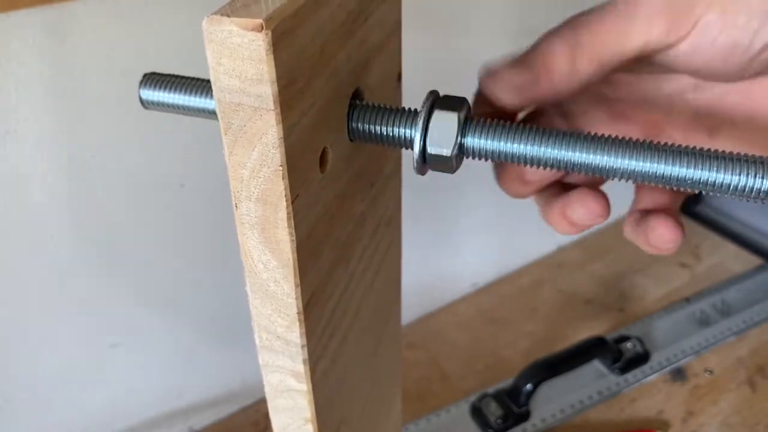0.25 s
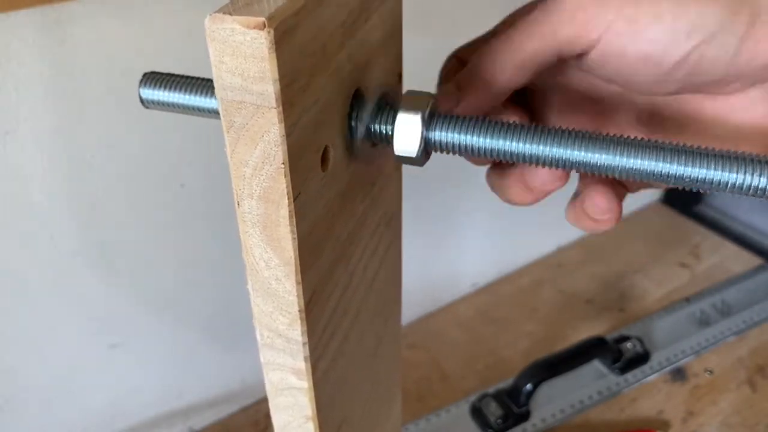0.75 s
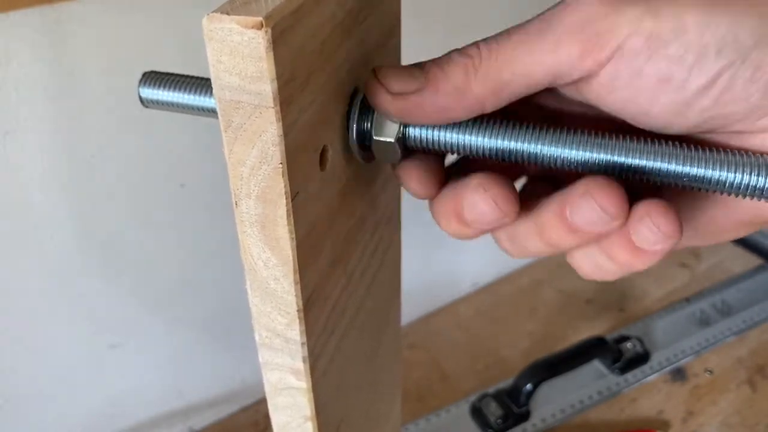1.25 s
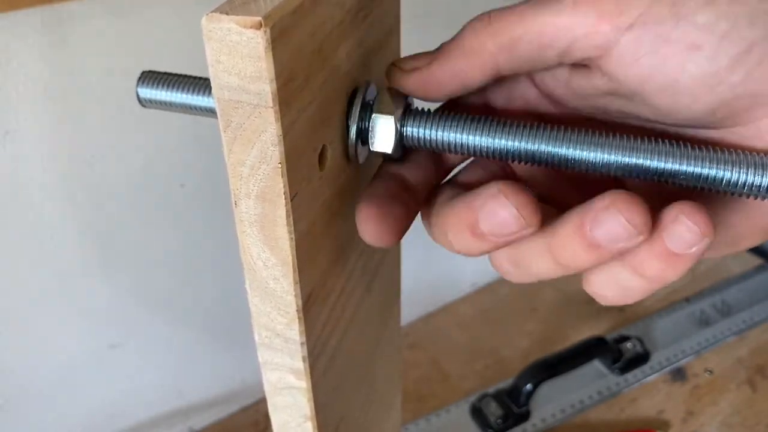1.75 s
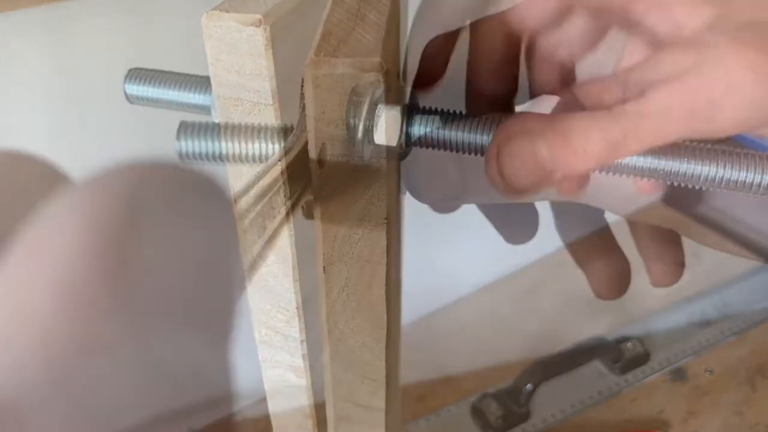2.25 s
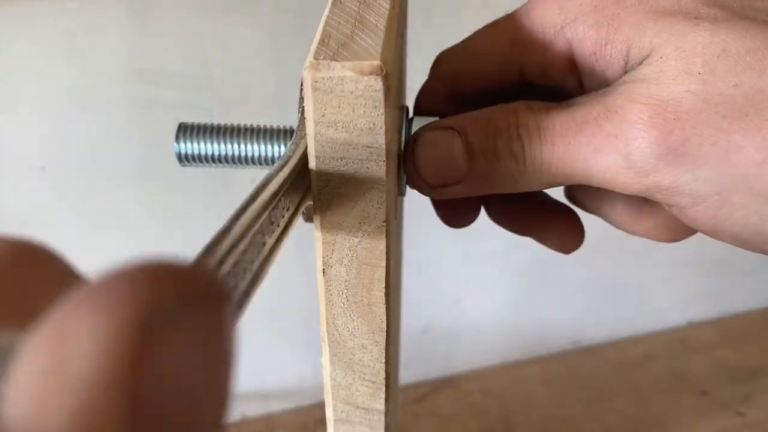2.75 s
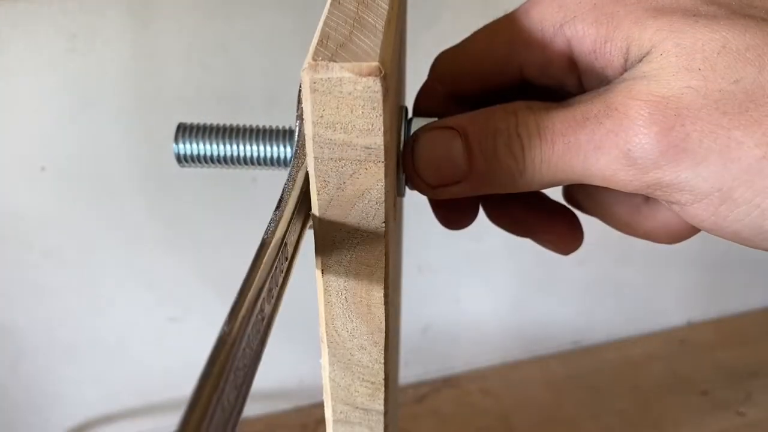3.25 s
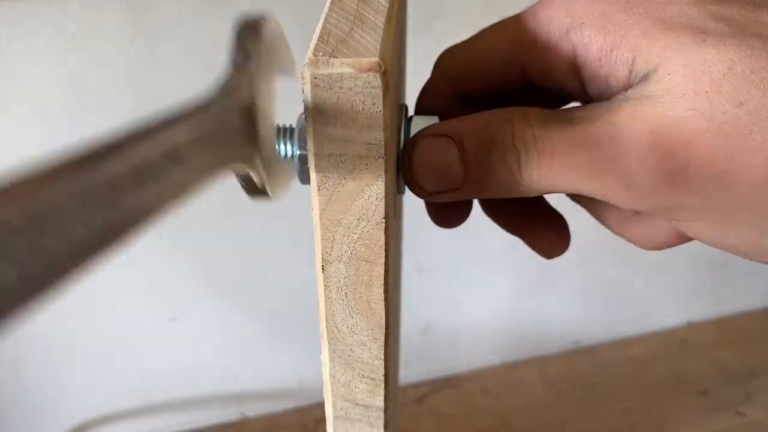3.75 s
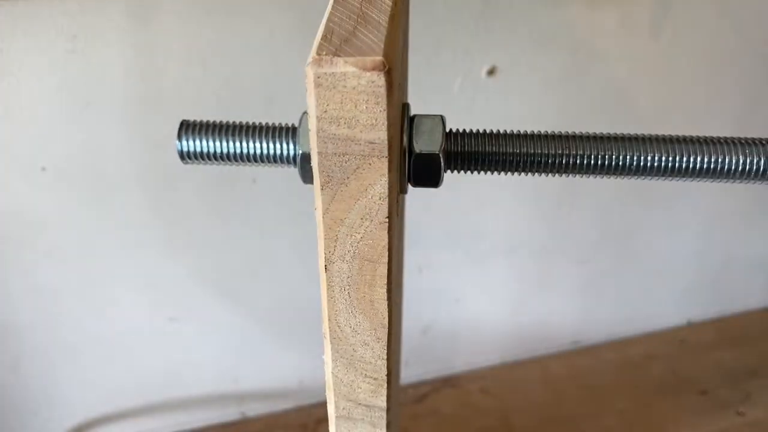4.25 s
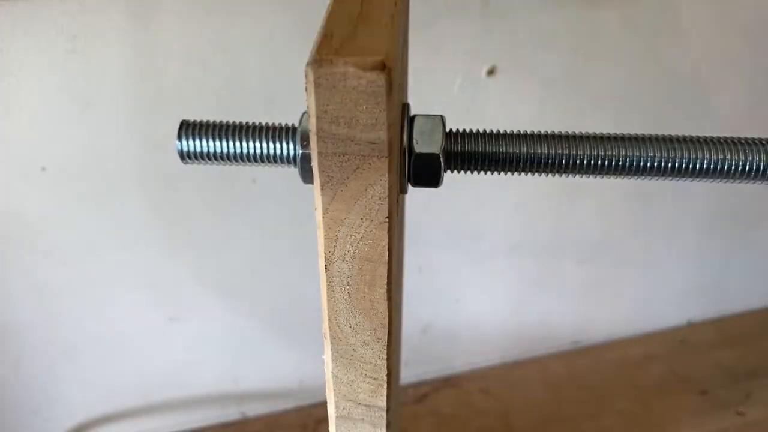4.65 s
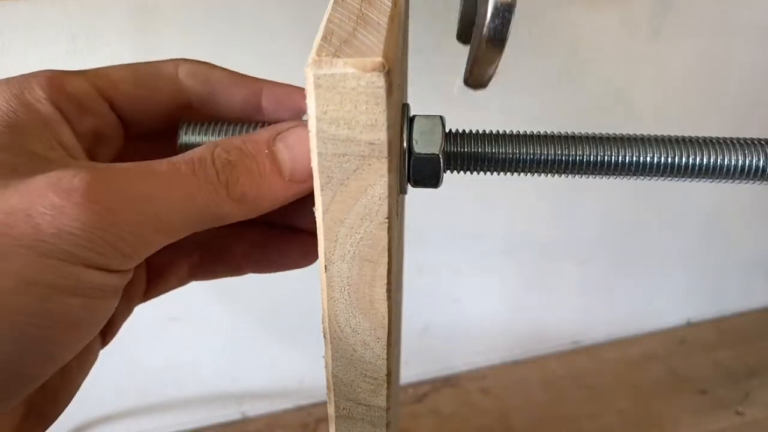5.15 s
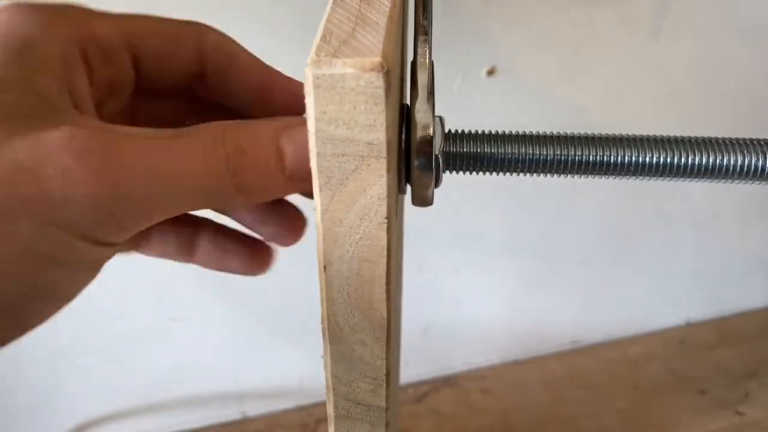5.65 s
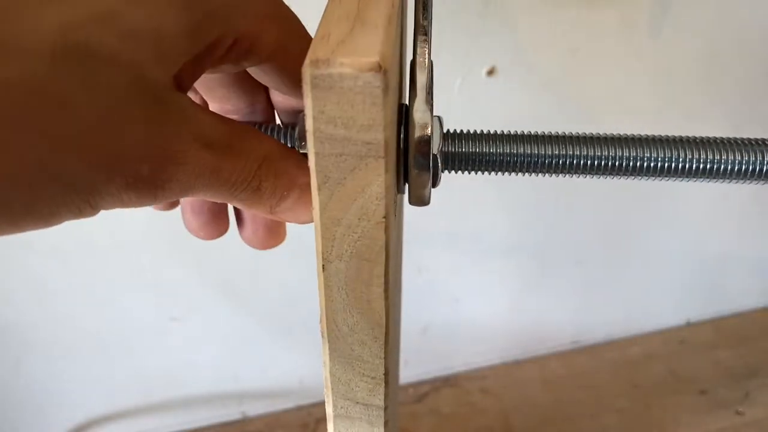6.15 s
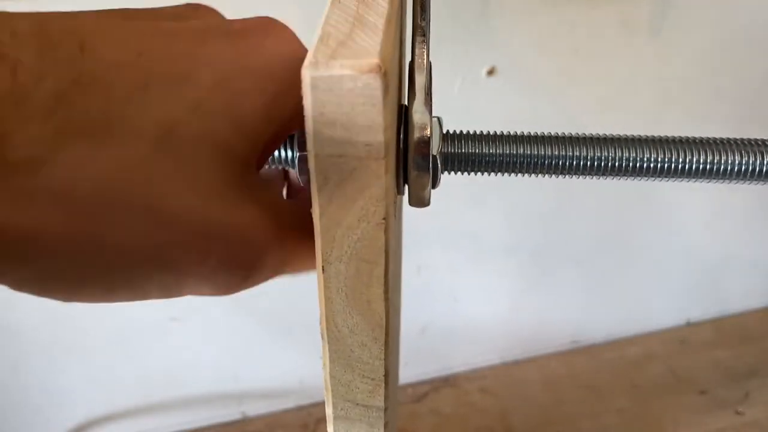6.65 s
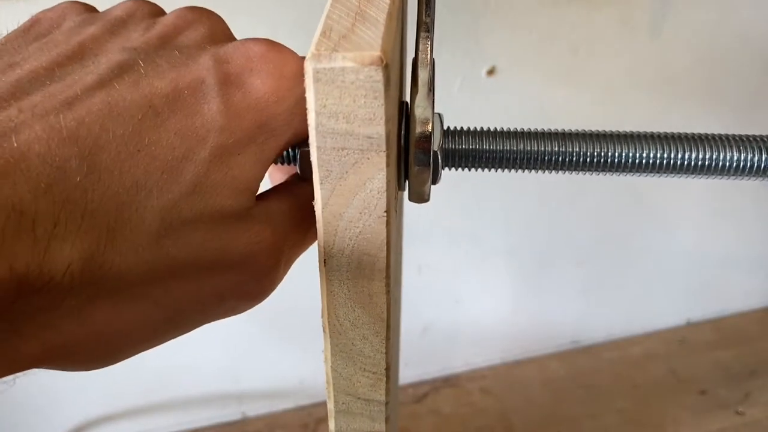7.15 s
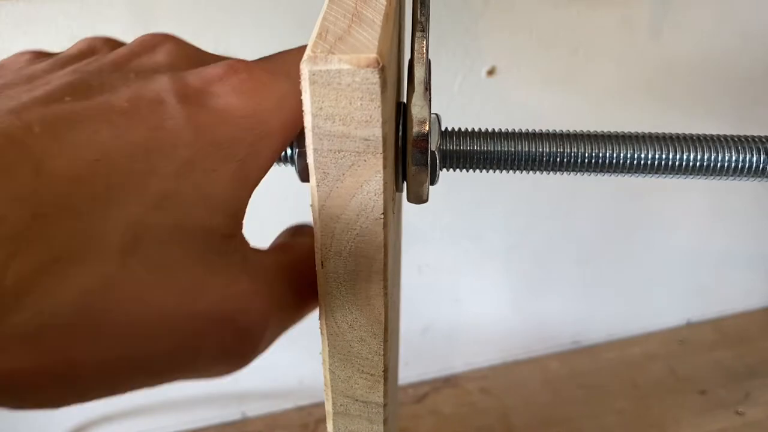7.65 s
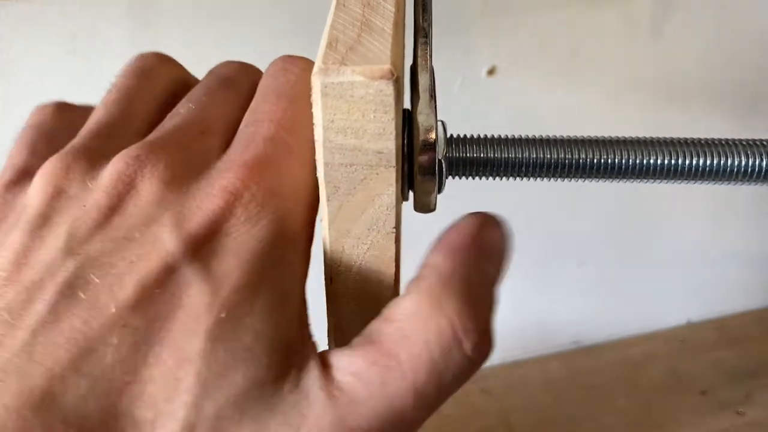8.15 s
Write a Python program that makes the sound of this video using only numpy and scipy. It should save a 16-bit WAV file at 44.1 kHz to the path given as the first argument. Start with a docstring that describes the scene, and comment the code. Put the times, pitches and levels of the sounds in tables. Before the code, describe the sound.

Thumb flicks spin a loose nut down a threaded rod with bright clinks; later a wrench clacks sharply and the workbench thuds dully.

```python
"""Over soft room noise a steel nut spins along a threaded rod: thumb flicks set it rattling, it clinks on rod and
washer, and a board hums along; each runout is a duller hum. The room noise cross-fades to that of a later moment.
Bench thumps glide down in pitch; a wrench knocks, rings, slides and squeaks on the nuts, and a palm brushes wood.
Metal and wood are banks of decaying modes driven by noisy contacts; slides and brushing are filtered random ticks.
A small quiet workshop, heard from close by in stereo."""
import sys
import numpy as np
from scipy import signal
from scipy.fft import rfft, irfft
from scipy.io import wavfile
from scipy.ndimage import uniform_filter1d

SR = 44100
rng = np.random.default_rng(int(sys.argv[2]) if len(sys.argv) > 2 else 0)


def dump(signal):
    """Clip the signal to [-1, 1] and save it as 16-bit WAV at the path in sys.argv[1]."""
    limited = np.clip(np.atleast_2d(signal).T, -1, 1)
    pcm = np.round(limited * 32767).astype(np.int16)
    wavfile.write(sys.argv[1], SR, pcm)


N = 370440
T = np.arange(N) / SR


def amp(db):
    """Decibels to a linear factor."""
    return 10 ** (np.asarray(db) / 20)


def evened(x):
    """Scales to rms 1."""
    return x / np.sqrt(np.mean(x ** 2) + 1e-20)


def unit(x):
    """Scales to energy 1."""
    return x / np.linalg.norm(x)


def peaked(rings):
    """Scales a set of rings so that their sum peaks at 1."""
    return rings / abs(rings.sum(0)).max()


def read(points, hz):
    """Reads a curve of (Hz, value) points on a log frequency axis."""
    f, value = np.transpose(points)
    return np.interp(np.log(hz + 1), np.log(f + 1), value)


def add(mix, s, sound):
    """Lays a sound into the mix at s seconds."""
    part = mix[round(s * SR):][:len(sound)]
    part += sound[:len(part)]


def colour(x, points, tilt_db=0):
    """Filters by a spectrum and a tilt in dB per octave about 4 kHz."""
    hz = np.fft.rfftfreq(len(x), 1 / SR)
    gain_db = read(points, hz) + tilt_db * np.log2(hz / 4000 + 0.016)
    return irfft(rfft(x) * amp(gain_db), len(x))


def strokes(rows, rise_s, sag_db_per_s, stop_s):
    """Gain curve of (start s, length s, dB) strokes: a rise, a steady sag in force, a quick stop."""
    out = np.zeros(N)
    for s, length, db in rows:
        t = np.maximum(T - s, 0)
        rise = np.minimum(t / rise_s, 1) ** 2
        stop = np.exp(-np.maximum(t - length, 0) / stop_s)
        out += rise * amp(db - sag_db_per_s * t) * stop
    return out


def as_modes(peaks, slim):
    """(Hz, width, dB) -> (Hz, dB, t60): a wider peak dies sooner and needs a stronger start."""
    return [(hz, db + 20 * np.log10(width / 100), 2.2 / (slim * width)) for hz, width, db in peaks]


def focused(modes, centre_hz, loss_db):
    """Favours the modes near one pitch; loss_db is lost one octave off."""
    return [(hz, db - loss_db * np.log2(hz / centre_hz) ** 2, *rest) for hz, db, *rest in modes]


def ringing(modes, spread_db, tilt_db=0, start_s=.0001, lag=0, size=8192):
    """Rings of (Hz, dB, t60) modes, one row each; every contact point wakes them in other shares."""
    hz, db, t60 = np.transpose(modes)[:, :, None]
    t = np.arange(size) / SR
    chance = rng.standard_normal((2, len(modes), 1))
    db = db + spread_db * chance[0] + tilt_db * np.log2(hz / 4000)
    tone = np.sin(2 * np.pi * hz * (1 + 0.0033 * chance[1]) * t)
    onset = 1 - np.exp(-(t / start_s * (hz / 4000) ** lag) ** 2)  # a soft contact starts without a click
    return amp(db - 60 * t / t60) * tone * onset


def random_ticks(per_s, spread_db, limit=4):
    """Small contacts at random times, a few of them much stronger."""
    return amp(spread_db * np.minimum(rng.exponential(1, N), limit)) * (rng.random(N) < per_s / SR)


def rattle(drive, per_s, spread_db, modes, count=6):
    """Random small contacts under a drive curve, shared among several contact points that ring the modes."""
    ticks = drive * evened(random_ticks(per_s, spread_db))
    point = rng.integers(0, count, N)
    out = np.zeros(N)
    for k in range(count):
        ring = unit(ringing(modes, 3.5).sum(0))
        out += signal.oaconvolve(ticks * (point == k), ring)[:N]
    return out


def grit(spread_db, limit):
    """Random ticks of either sign: a rough surface catching and slipping."""
    return random_ticks(2500, spread_db, limit) * rng.choice([-1, 1], N)


LEAD_S = .03  # room before a blow for its run-up
CHATTER_DB, HOLD_POWER = 3., 1.54  # unevenness of a contact; how long it holds before it dies


def blow(s, db, rise_ms, ms, dry, rings):
    """A chattering contact that builds up and dies, heard dry and through the modes, scaled to its peak."""
    lead = min(s, LEAD_S)
    size = len(dry)
    t = 1000 * (np.arange(size) / SR - lead)  # ms
    run_up = t / (abs(rise_ms) + 0.21)
    release = -(abs(t) / (abs(ms) + 0.071)) ** HOLD_POWER
    contact = np.exp(np.where(t < 0, run_up, release))
    contact *= amp(CHATTER_DB * evened(uniform_filter1d(rng.standard_normal(size), size=60)))
    force = rfft(rng.standard_normal(size) * contact, 2 * size)
    modes = rfft(rings, 2 * size)
    # even out how strongly the random force happens to wake each mode
    share = np.linalg.norm(modes * force, axis=1) / np.linalg.norm(modes, axis=1)
    ring = irfft(force * (modes / share[:, None]).sum(0))[:size]
    sound = dry * contact + ring
    return s - lead, amp(db) * sound / abs(sound).max()


# Room noise of the first and the later moment, middle and side. Each row: pitch in Hz, relative level in dB.
FIRST_MID = [(25, -55), (60, -54), (95, 0), (180, 2), (445, -13.5), (560, -19), (1400, -24.5),
             (3700, -23.5), (9000, -28.5), (15300, -36), (16200, -50)]
FIRST_SIDE = [(25, -39), (177, 15), (952, 10.5), (2530, 11), (6210, -15), (7300, -44), (15200, -31),
              (16500, -26)]
SECOND_MID = [(15, -49.5), (25, -25), (53, -2), (103, 1), (159, -10.5), (245, -7.5), (296, -20.5),
              (339, -13), (600, -26.5), (2750, -28.5), (4860, -32.5), (7510, -37.5), (9080, -55),
              (11600, -44.5), (16500, -82)]
SECOND_SIDE = [(15, -41.5), (25, -2.5), (87, 2), (854, -2), (3320, -25), (4240, -79), (7110, -53),
               (7710, -20.5), (8830, -22.5), (13600, -35), (16500, -45.5)]
# Slow swell of the later room. Each row: time in seconds, gain of the rumble under 300 Hz in dB, gain of the hiss in dB.
SECOND_SWELL = [(1.9, -7, -8.5), (2.7, 1, 2.5), (3.4, -0.5, 3), (4.2, 2.5, 1), (5.2, 1, 1), (6.3, 4, 0.5),
                (7.0, 0.5, 1), (7.5, 0.5, 1), (8.4, 6.5, 2)]
# Cross-fade between the two rooms: start in seconds, end in seconds.
FADE = 1.72, 2.64


def room_tone():
    """Shaped noise in mid and side for two moments, cross-faded; the later one swells slowly."""
    def noise(points, db):
        return amp(db) * evened(colour(rng.standard_normal(N), points))

    def swell(column):
        s, db = np.transpose(SECOND_SWELL)[[0, column]]
        return amp(np.interp(T, s, db, left=-200, right=-200))  # silent before the first row

    first = np.array([noise(FIRST_MID, -57.5), noise(FIRST_SIDE, -66)])
    second = np.array([noise(SECOND_MID, -54.5), noise(SECOND_SIDE, -64.5)])  # levels before the swell
    rumble = signal.sosfiltfilt(signal.butter(2, 300, fs=SR, output="sos"), second)
    hiss = second - rumble
    second = rumble * swell(1) + hiss * swell(2)
    fade = np.clip((T - FADE[0]) / (FADE[1] - FADE[0]), 0, 1)
    return first * np.cos(np.pi / 2 * fade) + second * np.sin(np.pi / 2 * fade)


# Thumb flicks that set the nut running loose on the thread.
# Each row: start in seconds, length in seconds, rattle level in dB, board rumble level in dB.
FLICKS = [(0.053, 0.11, -52, -47), (0.148, 0.01, -65, -52), (0.21, 0.082, -54.5, -51.5),
          (0.334, 0.1, -44.5, -48), (0.466, 0.37, -48, -50), (0.632, 0.055, -62, -47),
          (0.733, 0.074, -52, -50), (0.874, 0.073, -61, -51), (1, 0.097, -51, -53.5),
          (1.133, 0.055, -53, -57), (1.29, 0.053, -52, -54), (2.005, 0.066, -50, -56.5),
          (2.176, 0.11, -53.5, -58.5)]
FLICK_RISE_S, FLICK_SAG_DB_PER_S, FLICK_STOP_S = 0.026, 50, 0.0079
# A hand steadying the rod hums in the board. Each row: start in seconds, length in seconds, level in dB.
HOLD = [(0, 2.294, -58.5)]
# Modes of the board holding the rod. Each row: pitch in Hz, width in Hz before a common factor, strength in dB.
BOARD = [(170, 23, 0), (245, 24, 11.5), (400, 150, 7), (433, 11, 10), (642, 37, -3), (950, 160, -9),
         (1300, 52, -29)]
PUSH_LEAD_S, PUSH_RISE_S = 0.016, 0.0093  # the board feels the thumb sharply, before the nut runs


def board_hum():
    """The thumb's pushes and the steadying hand shake the board's low modes."""
    pushes = [(s - PUSH_LEAD_S, length, db) for s, length, _, db in FLICKS]
    push = strokes(pushes, PUSH_RISE_S, FLICK_SAG_DB_PER_S, FLICK_STOP_S)
    hold = strokes(HOLD, 0.0046, 0, 0.061)
    return rattle(push + hold, 700, 4., as_modes(BOARD, 1.2))


# The loose nut keeps wobbling between flicks. Each row: start in seconds, length in seconds, level in dB.
WOBBLE = [(0, 1.1, -89), (1.58, 0.65, -75)]
# Modes of rod, nut and washer: pitch in Hz.
ROD_HZ = [883, 1150, 1440, 2000, 2160, 3120, 3540, 3980, 5280, 5740, 5970, 7240, 7570, 7920, 9250, 9600,
          10250, 12100, 15000]
# One row per pitch in ROD_HZ. Each row: width in Hz before a common factor, strength in dB.
ROD = [(55.5, 10.5), (46, 8.5), (97, 3), (90, 4.5), (69.6, 9), (55, -7.5), (110, 4), (200, -6), (89, 6.5),
       (70.4, 5), (39.6, 0), (71.6, 6.5), (100, 2), (50, -9), (200, -6), (137, 6.5), (151.2, 3), (129, 8),
       (191, 5.5)]
ROD_MODES = as_modes([(hz, *row) for hz, row in zip(ROD_HZ, ROD)], 0.79)


def nut_rattle():
    """The loose nut scrapes round the thread, its many tiny contacts ringing the rod."""
    runs = [(s, length, db) for s, length, db, _ in FLICKS]
    run = strokes(runs, FLICK_RISE_S, FLICK_SAG_DB_PER_S, FLICK_STOP_S)
    wobble = strokes(WOBBLE, 0.033, 0, .05)
    return rattle(run + wobble, 3500, 3.5, ROD_MODES, count=8)


# The nut knocks on rod and washer. Each row: time in seconds, peak level in dB, treble tilt in dB per octave,
# contact time in ms, dry click in dB against the ring.
CLINKS = [(0.03, -50, 0, 1.3, -16), (0.056, -47, 8, 8.5, -20), (0.0668, -31.5, 5.5, 18, -19),
          (0.1312, -26, 5.5, 8.4, -35), (0.1865, -43, 5, 1.5, -4), (0.203, -35.5, 3, 7.9, -14),
          (0.222, -30.5, 1.5, 14, -28.5), (0.3619, -26.5, 5.5, 1.6, -8), (0.3799, -28, 4.5, 9.7, -26),
          (0.4313, -33, 3, 1.2, -15), (0.4987, -29.5, -0.5, 3.7, -20), (0.522, -33, 8, 4.1, -23),
          (0.5531, -37, 6, 4.3, -26), (0.576, -36, 12, 1.1, -20), (0.6325, -25.5, 3, 15, -26),
          (0.6472, -33, 4.5, 19, -33), (0.7007, -41.5, 0, 14, -23), (0.7356, -30.5, 12, 1.6, -22),
          (0.7597, -29, 2.5, 15.6, -24), (0.818, -45, 1.5, 6, -30), (0.879, -37.5, 0.5, 15, -17),
          (0.9982, -45.5, 3, 1.8, -17), (1.025, -34.5, 0, 3.8, -12), (1.106, -43.5, -6, 2.9, -1),
          (1.166, -32, 0.5, 3.8, -12), (1.173, -25, 1.5, 2.4, 20), (1.237, -45.5, -10, 3.2, 6),
          (1.287, -45, 0, 8.8, -12), (1.3155, -20.5, 2, 1.2, 8), (1.333, -36, 4, 3.2, -3),
          (1.383, -44, -7, 3.9, 10), (1.442, -51, -7, 2.9, 2), (1.62, -51, -1.5, 14, -23),
          (1.705, -50, -0.5, 2, -8.5), (1.8143, -46.5, -5, 5, -2), (1.875, -50, -6, 1.8, 0),
          (1.9273, -39, 1, 2.1, -21), (1.9854, -35.5, 0, 3.2, -8.5), (2.037, -37, -15, 6.5, 1),
          (2.1656, -31.5, 8, 2.2, -27), (2.1924, -31.5, -2.5, 7.7, 7), (2.206, -28, 41, 1.6, -14),
          (2.241, -42, 21, 6.5, -23), (2.2936, -43.5, 26, 1.6, -16)]
# Dry click of the washer on the board. Each row: pitch in Hz, relative level in dB.
WASHER = [(300, -51), (1000, 2), (1400, 11), (2500, -0.5), (3000, 16), (3500, 9), (4000, 16), (4500, 8),
          (9000, 14), (14000, -1)]
CLINK_RISE = 0.21  # run-up as a share of the contact time


def nut_clinks():
    """Each knock is a dry washer click plus the ring of the rod's modes."""
    out = np.zeros(N)
    for s, db, tilt_db, ms, click_db in CLINKS:
        ring = ringing(ROD_MODES, 4.5, tilt_db, 0.001)
        click = evened(colour(rng.standard_normal(8192), WASHER, tilt_db))
        add(out, *blow(s, db, CLINK_RISE * ms, ms, amp(click_db) * click, peaked(ring)))
    return out


# The nut runs out with a duller hum. Each row: start in seconds, length in seconds, level in dB.
SPIN_DOWN = [(1.58, 0.11, -68), (2.04, 0.061, -68), (2.21, 0.18, -60.5)]


def spin_down():
    """Sparser contacts hum in the rod modes near 1600 Hz, which ring longer here."""
    near = focused(ROD_MODES, 1600, 9)
    dull = [(hz, db, 1.8 * t60) for hz, db, t60 in near]
    return rattle(strokes(SPIN_DOWN, 0.029, 60, 0.017), 900, 3., dull, count=4)


def nut():
    """All of the spinning, without deep bass and with an early treble edge."""
    band = signal.butter(6, [80, 15600], "band", fs=SR, output="sos")
    return signal.sosfilt(band, board_hum() + nut_rattle() + nut_clinks() + spin_down())


# Bench jolts. Each row: start in seconds, level in dB, pitch factor.
THUMPS = [(2.482, -37, 0.99), (3.566, -44.5, 0.89), (3.853, -42.5, 0.76), (4.553, -45.5, 0.77),
          (5.588, -39, 0.96), (5.677, -39.5, 1.05), (5.729, -33, 1.03), (5.78, -43, 0.91),
          (6.013, -42, 1.26), (6.132, -36, 1.08), (6.262, -38.5, 1.12), (6.411, -23, 1.08),
          (6.467, -36, 0.99), (6.531, -31.5, 1.14), (6.558, -30.5, 0.87), (6.61, -37, 0.89),
          (6.727, -25.5, 1), (6.784, -35, 1.6), (6.865, -32.5, 1.11), (6.891, -40, 0.83),
          (6.911, -39, 1.13), (7.826, -39.5, 1.04), (7.869, -45, 1.34), (8.054, -36, 0.93),
          (8.304, -33, 1.3), (8.321, -33.5, 1.85)]
THUMP_S = 0.02  # time to the top of a thump


def bench():
    """Bending waves in the bench: the high part arrives first, so each thump glides down, then a weak shiver."""
    out = np.zeros(N)
    t = np.arange(12000) / SR
    u = t / THUMP_S
    thump = u ** 2 * np.exp(1 - u ** 2)
    shiver = 0.29 * (1 - np.exp(-u ** 4)) * amp(-60 * t / 1.2)
    for s, db, pitch in THUMPS:
        hz = pitch * (56 + 230 * np.exp(-t / 0.0108))
        add(out, s, amp(db) * (thump + shiver) * np.sin(2 * np.pi * np.cumsum(hz) / SR))
    return out


# Wrench blows. Each row: time in seconds, peak level in dB, run-up in ms, contact time in ms,
# knock centre in Hz, knock focus in dB lost one octave off, steel ring in dB against the knock,
# ring centre in Hz, ring focus in dB lost one octave off, share of the free ring time that the grip leaves.
BLOWS = [(3.566, -26.5, 0.46, 5.1, 1850, 13, 6, 4660, 16, 0.069),
         (3.59, -30.5, 4.3, 26, 665, 10, -5.5, 4500, 4, 0.22),
         (3.629, -34, 17, 40.5, 1280, 13, 0.5, 5460, 900, 0.15),
         (3.66, -39.5, 1, 6.1, 2300, 18, 3, 3100, 40, 0.15),
         (3.686, -39, 2.8, 5.9, 3200, 3.5, 7, 5460, 2000, .14),
         (5.381, -25.5, 0.2, 2.8, 3040, 15.5, -5.5, 8900, 2, 0.22),
         (5.388, -27, 3.9, 6.6, 856, 11, -26, 8900, 8, 0.18),
         (5.412, -27.5, 0.3, 3.6, 3100, 16, -9.5, 9000, 13, 0.2),
         (5.418, -31, 1.5, 22, 870, 20, -31.5, 9000, 8, 0.18),
         (5.425, -33.5, 1, 19, 3000, 15, -13, 9000, 11, 0.42),
         (5.484, -32.5, 4.7, 10, 2900, 2, -5.5, 6000, 11, 0.11),
         (5.499, -28, 5.2, 16, 3084, 2.5, -15, 6060, 12, 0.13),
         (5.5205, -4.5, 0.57, 3.4, 2130, 2.5, -15.5, 6060, 2.5, 0.15),
         (5.528, -22.5, 2.3, 4.5, 960, 16, -14, 5400, 29, 0.1),
         (5.657, -33.5, 0.6, 5, 2930, 0, -36, 4900, 11, .3),
         (5.959, -30, 0.46, 5.1, 3600, 1.5, 4, 4000, 52, 0.4),
         (5.976, -32, 6.8, 12, 1560, 25, -24, 4030, 34, 0.47),
         (6.044, -40.5, 0.6, 8.3, 1300, 4, 5, 5140, 12, 0.66),
         (6.104, -27, 0.91, 6.4, 2900, 8, -21, 5940, 10, 0.28),
         (6.108, -25.5, 0.7, 15, 5500, 10, 6, 7950, 36, 0.3),
         (6.112, -14.5, 1.3, 9.2, 3800, 2.5, 9, 4140, 49, 0.3),
         (6.12, -19, 2.7, 7.5, 4300, 3, -7.5, 4170, 14, 0.27),
         (6.133, -11, 0.3, 2.2, 2010, 1, -25, 4000, 30, 0.46)]
# Modes of the wrench steel: pitch in Hz.
WRENCH_HZ = [3052, 4002, 5130, 5460, 5978, 6850, 7668, 8720, 11270, 12350, 15100]
# One row per pitch in WRENCH_HZ. Each row: strength in dB, free ring time (t60) in seconds.
WRENCH = [(-7, 0.4), (0, 0.19), (-1, 0.095), (-9, 0.4), (-12, 0.11), (-8, 0.11), (-10.5, 0.33), (-36, .2),
          (-13.5, 0.12), (-9, 0.25), (-13, 0.065)]
STEEL_MODES = [(hz, db, t60) for hz, (db, t60) in zip(WRENCH_HZ, WRENCH)]
# Modes of board and nut under the wrench: pitch in Hz.
KNOCK_HZ = [490, 655, 865, 1000, 1200, 1410, 1680, 1770, 1880, 2240, 2470, 2985, 3340, 3520, 3890, 4180,
            4450, 4850]
# One row per pitch in KNOCK_HZ. Each row: width in Hz before a common factor, strength in dB.
KNOCK = [(49.6, 0.5), (50, 3.5), (45, 2), (35, -3.5), (50, -0.5), (50, -10), (50, -2), (49.8, 1.5),
         (60.1, -3.5), (70, -0.5), (70.2, -1), (55, -5.5), (55, -8.5), (70, 1), (45, -4.5), (55, -10.5),
         (65, -8), (140, -4)]
KNOCK_MODES = as_modes([(hz, *row) for hz, row in zip(KNOCK_HZ, KNOCK)], 1.15)
# Broad colour of the dry crack and the slide. Each row: pitch in Hz, relative level in dB.
KNOCK_WIDE = [(120, -41.5), (200, 0.5), (876, -9.5), (1650, -14), (3560, -11.5), (9140, -30),
              (12500, -40.5), (16500, -44)]
CRACK_DB, CRACK_FOCUS = -11, 0.21  # dry crack against the ring; its share of the knock focus
WOOD_LAG = 1.2  # low wood modes build up later by this power of pitch


def wrench_blows():
    """A dry crack and a woody knock with the thin ring of the gripped steel; the place struck picks the modes."""
    out = np.zeros(N)
    for s, db, rise_ms, ms, knock_hz, knock_loss_db, ring_db, ring_hz, ring_loss_db, free in BLOWS:
        crack_colour = focused(KNOCK_WIDE, knock_hz, CRACK_FOCUS * knock_loss_db)
        crack = evened(colour(rng.standard_normal(8192), crack_colour))
        wood = ringing(focused(KNOCK_MODES, knock_hz, knock_loss_db), 1.5, 0, .0004, WOOD_LAG)
        gripped = [(hz, a_db - min(ring_loss_db * np.log2(hz / ring_hz) ** 2, 99), free * t60)
                   for hz, a_db, t60 in STEEL_MODES]
        steel = ringing(gripped, 1.5, 0, .0004)
        rings = np.vstack([peaked(wood), amp(ring_db) * peaked(steel)])
        add(out, *blow(s, db, rise_ms, ms, amp(CRACK_DB) * crack, rings))
    return out


# The wrench slides over wood and nut. Each row: start in seconds, length in seconds, drive level in dB.
SLIDES = [(3.567, 0.046, -36.5), (3.62, 0.12, -45.5), (5.41, 0.078, -43), (5.53, 0.22, -32.5),
          (6.035, .08, -46), (6.165, .1, -40)]
SLIDE_RISE_S, SLIDE_SAG_DB_PER_S, SLIDE_STOP_S = 0.0067, 182.5, 0.01303


def wrench_slides():
    """Grit heard directly, and small contacts that ring the wood and nut with softened treble."""
    slide = strokes(SLIDES, SLIDE_RISE_S, SLIDE_SAG_DB_PER_S, SLIDE_STOP_S)
    scrape = amp(-14.5) * slide * evened(colour(grit(5.55, 5), KNOCK_WIDE, 0.68))
    body = rattle(amp(0.5) * slide, 2500, 3., KNOCK_MODES)
    return scrape + colour(body, [(2600, -2.5), (9000, -12.0)])


# Steel squeaks as the wrench is drawn off. Each row: start in seconds, length in seconds, level in dB.
SQUEAK = [(3.625, 0.079, -69)]
SQUEAK_HZ, SQUEAK_SAG_DB_PER_S = 5460, -18  # a negative sag: the squeak grows


def wrench_squeak():
    """Rubbing contacts ring the damped steel, the mode at the squeak pitch standing out by up to 9 dB."""
    steel = [(hz, db - min(2000 * np.log2(hz / SQUEAK_HZ) ** 2, 9), .3 * t60) for hz, db, t60 in STEEL_MODES]
    drive = strokes(SQUEAK, SLIDE_RISE_S, SQUEAK_SAG_DB_PER_S, SLIDE_STOP_S)
    return rattle(drive, 600, 3., steel, count=2)


# The palm brushes the wood. Each row: start in seconds, length in seconds, level in dB, treble tilt in dB per octave.
BRUSH = [(6.574, 0.029, -64, 7.5), (7.16, 0.0082, -58, -2), (7.683, 0.14, -66.5, -2)]
# Colour of skin on wood. Each row: pitch in Hz, relative level in dB.
BRUSH_COLOUR = [(1800, -28), (2300, 0), (2650, -14), (3050, 0), (3500, -4), (4000, -14), (5000, -5),
                (6500, -13), (16000, -28)]
BRUSH_RISE_S, BRUSH_STOP_S, BRUSH_SAG_DB_PER_S = 0.012, 0.015, -58  # the palm presses harder as it goes


def palm():
    """Skin catching and slipping on the grain: coloured random ticks."""
    slips = grit(4.3, 4)
    out = np.zeros(N)
    for s, length, db, tilt_db in BRUSH:
        press = strokes([(s, length, db)], BRUSH_RISE_S, BRUSH_SAG_DB_PER_S, BRUSH_STOP_S)
        out += press * evened(colour(slips, BRUSH_COLOUR, tilt_db))
    return out


def tail(t60s, start_s):
    """Dense reflections, each band dying at its own speed, energy 1."""
    hz, t, z = signal.stft(rng.standard_normal(SR // 2), SR, nperseg=256)
    taps = signal.istft(z * amp(-60 * t / read(t60s, hz)[:, None]), SR, nperseg=256)[1]
    return unit(taps * (np.arange(len(taps)) > start_s * SR))


# Decay of the workshop. Each row: pitch in Hz, reverberation time (t60) in seconds.
ROOM = [(250, 0.2055), (1000, 0.12), (4000, 0.115), (12000, 0.092)]
# Stereo width of the spinning, then of bench, wrench and palm. Each row: pitch in Hz, side filter gain in dB.
FIRST_WIDTH = [(60, -21), (110, -22), (200, -20), (380, -18.5), (700, -9), (1290, -8), (2380, -6.5),
               (4400, -13), (8120, -47), (15000, -10.5)]
SECOND_WIDTH = [(60, -30.5), (110, -24), (200, -7.5), (380, -17.5), (700, -6.5), (1290, -2), (2380, -14.5),
                (4400, -35.5), (8120, -4), (15000, 5)]


def widened(mid, width):
    """Makes a side signal from the sound turned a quarter cycle in phase plus its room reflections."""
    reflections = signal.oaconvolve(mid, tail(ROOM, 0.0013))[:N]
    side = signal.hilbert(mid).imag + amp(-8.0) * reflections
    return np.array([mid, colour(side, width)])


def scene():
    """Nut and wrench in the room, with bench and palm close by, over the room noise, as left and right."""
    room = tail(ROOM, 0.00613)

    def in_room(x):
        return x + amp(-12.5) * signal.oaconvolve(x, room)[:N]

    spinning = in_room(nut())
    tightening = in_room(wrench_blows() + wrench_slides() + wrench_squeak()) + bench() + palm()
    mid, side = widened(spinning, FIRST_WIDTH) + widened(tightening, SECOND_WIDTH) + room_tone()
    return np.array([mid + side, mid - side])


def record(dry):
    """Soft overload, strongest on the hardest blow, then a steep treble limit at 15950 Hz."""
    band_limit = signal.firwin(511, 15950, window=("kaiser", 9), fs=SR)
    return signal.oaconvolve(.6 * np.tanh(dry / .6), band_limit[None], "same")


dry = scene()
out = record(dry)
dump(out)
```